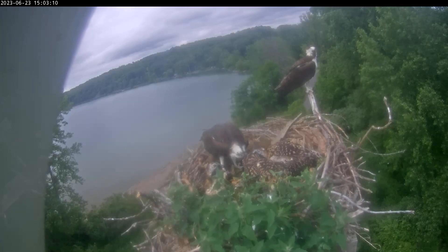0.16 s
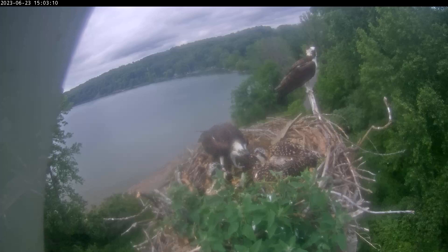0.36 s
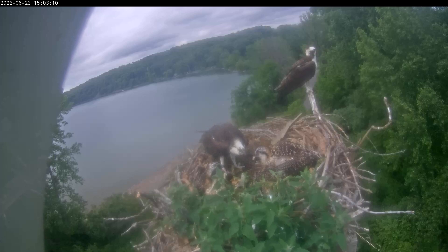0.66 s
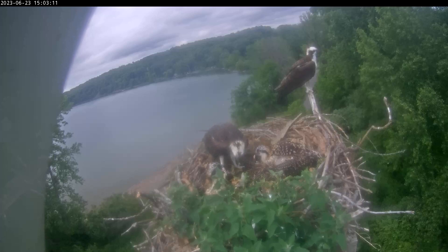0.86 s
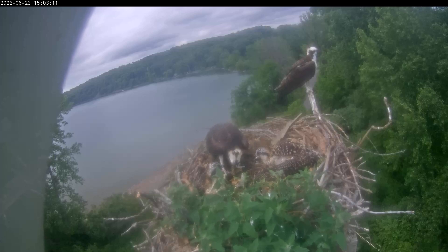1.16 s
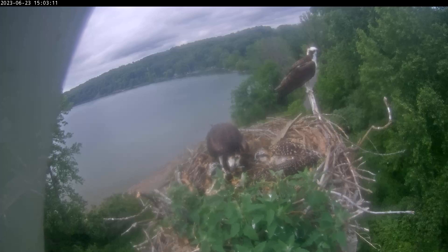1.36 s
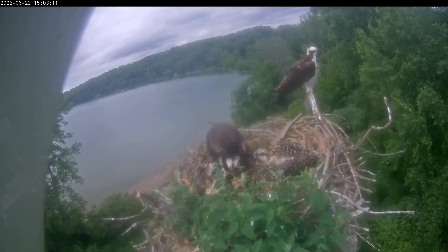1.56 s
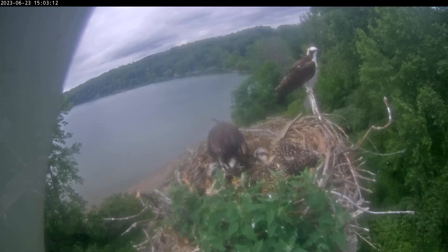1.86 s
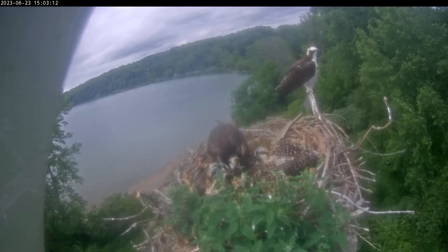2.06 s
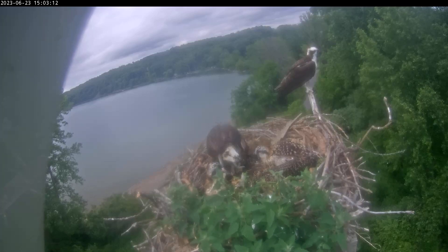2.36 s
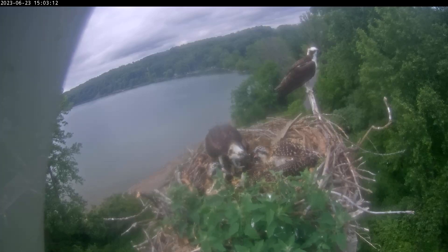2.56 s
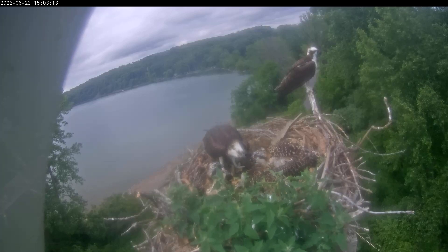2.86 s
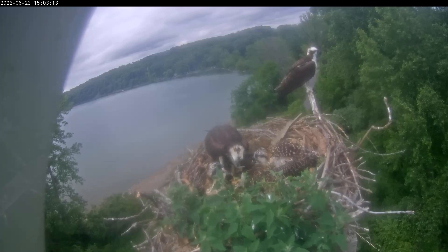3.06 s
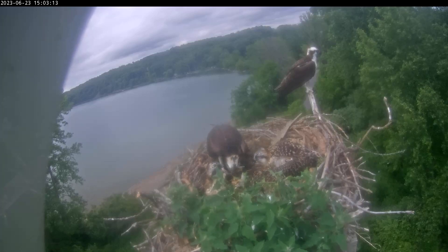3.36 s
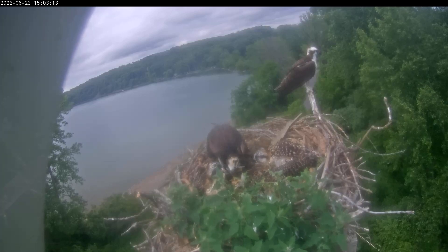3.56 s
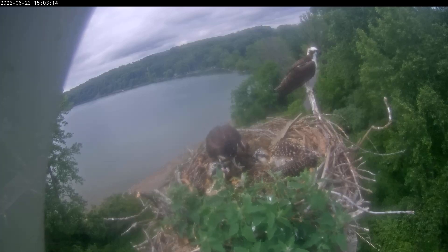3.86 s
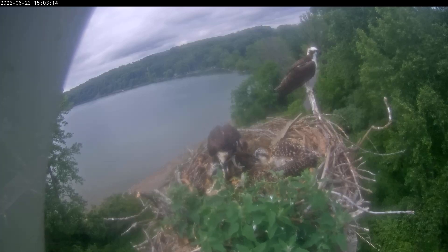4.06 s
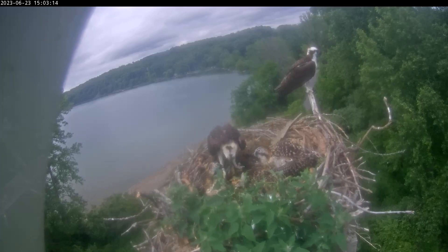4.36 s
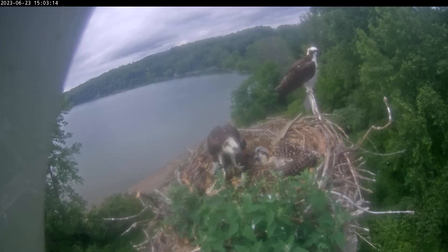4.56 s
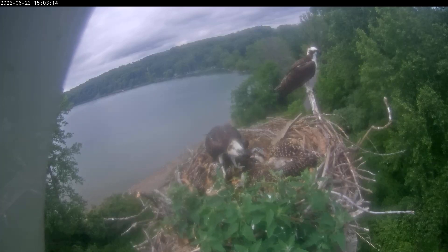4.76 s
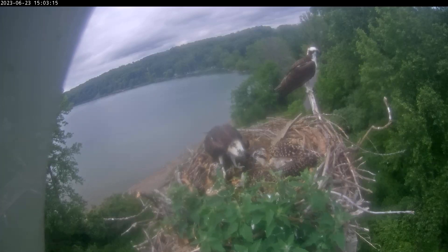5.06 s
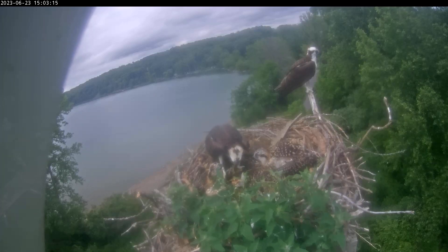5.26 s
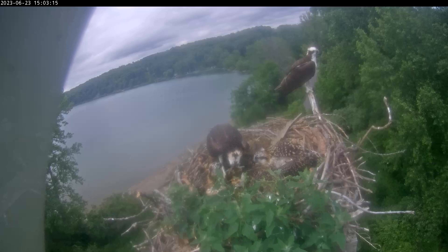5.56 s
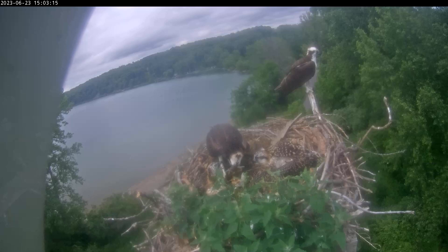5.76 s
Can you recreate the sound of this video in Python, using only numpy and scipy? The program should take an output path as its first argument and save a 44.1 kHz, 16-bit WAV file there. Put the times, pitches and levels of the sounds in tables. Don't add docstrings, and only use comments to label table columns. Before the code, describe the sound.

A chick squeak and a bright parent whistle open the scene, followed by twig rattle and thin distant piping. Sparse chirps, a wooden creak and small clicks follow; a rounder whistle stands out near the middle, then rapid squeaks and a harsh yelp cluster toward the end. Open lakeside woodland, little reverberation, dull small microphone with low wind buffeting and soft steady hiss.

```python
import sys
import numpy as np
from scipy import signal
from scipy.io import wavfile

SR = 44100
rng = np.random.default_rng(int(sys.argv[2]) if len(sys.argv) > 2 else 0)


def nominal_scale(level):
    x = np.asarray(level, float) / 20
    return 10 ** x


def pcm_store(signal):
    levels = np.round(np.clip(np.atleast_2d(signal), -1, 1) * 32767)
    wavfile.write(sys.argv[1], SR, levels.astype(np.int16).T)


N = 260190

# f/Hz, level per Hz/dB
AIR_COLOUR = [(93, -24.5), (135, -13), (290, -9.5), (328, -14), (484, -13), (2250, -23), (4330, -27),
              (8000, -34.5)]
AIR_DB = -62.5

# t/s, push level/dB
WIND_PUSH = [(0.0, -38), (0.3, -41), (1.0, -45), (1.07, -28.5), (1.2, -36.5), (1.44, -49.5), (1.6, -42),
             (1.9, -54), (1.97, -36), (2.07, -55), (3.1, -43.5), (3.27, -32.5), (3.35, -35.5), (3.5, -48.5),
             (4.6, -57), (4.81, -68), (4.9, -50.5), (5.9, -47)]
RUMBLE_DB, RUMBLE_FOLLOWS = -63, .22

# t/s, length/s, level/dB
FAR_PIPES = [(.175, 0.059, -58.5), (.485, 0.073, -57), (.695, .065, -59.5), (.84, 0.058, -56),
             (.99, 0.042, -55), (1.14, 0.046, -57), (1.245, .04, -69)]
PIPE_HZ = 4590
ANSWER_S, ANSWER_EVERY_S, ANSWER_LENGTH_S, ANSWER_HZ, ANSWER_DB = .645, .147, .029, 2505, -65
# t/s, length/s, start f/Hz, end f/Hz, level/dB
FAR_NOTES = [(.395, .015, 3100, 2600, -53), (.9, .07, 1580, 1560, -70.5), (1.235, .04, 3300, 3300, -65.5),
             (1.762, .032, 7050, 7100, -68), (2.815, .02, 2100, 2100, -65.5),
             (2.82, .022, 4150, 4400, -62.5), (3.015, .012, 2500, 2500, -64.5),
             (3.585, .015, 3000, 3000, -70), (3.905, .04, 8000, 8000, -65), (4.075, .03, 5300, 5300, -64.5),
             (4.5, .03, 5250, 5300, -61), (4.57, .015, 4450, 4550, -53), (4.843, .022, 3650, 3200, -57.5),
             (4.885, .04, 4600, 5400, -69), (5.04, .025, 6400, 5800, -61), (5.193, .027, 6300, 5700, -59.5),
             (5.505, .025, 6200, 5800, -66)]
# t/s, level/dB
CHORUS_LEVEL = [(0.0, -69.5), (0.35, -62.5), (0.8, -69.5), (2.48, -70), (2.97, -65.5), (3.57, -74),
                (3.93, -66), (4.76, -56.5), (5.21, -63), (5.9, -74)]
# f/Hz, width/Hz, level/dB
FAR_VOICES = [
    (4350, 760, -2),
    (4820, 130, -7),
    (5310, 330, -6),
]
# t/s, half length/s, level/dB
HIGH_SWELLS = [(0.475, 0.16, -71.5), (2.972, 0.28, -66.5), (4.417, 0.24, -66), (5.1, .1, -62),
               (5.33, .13, -61), (5.55, .1, -67)]
HIGH_REST_DB = -78.5

# t/s, level/dB
THUDS = [(.43, -55), (.54, -53), (.66, -55), (.76, -55), (1.74, -55), (2.3, -57), (3.86, -55), (4.3, -57)]
THUD_HZ, THUD_S = 150, .035

# t/s, peak level/dB, brightness/dB, rattle length/s
TICKS = [(0.387, -37.5, -1.5, 0.0073), (0.438, -44, -9, 0.016), (0.641, -43.5, -33, 0.014),
         (0.716, -41.5, -24, 0.0061), (0.743, -50.5, -13, 0.026), (0.765, -42, -25, 0.0066),
         (1.292, -42, -33, 0.017), (1.303, -39.5, -38, 0.0065), (1.623, -44.5, -39, 0.0058),
         (1.632, -43.5, -32, 0.021), (1.942, -39.5, -39, 0.02), (1.955, -37.5, -39, 0.014),
         (2.239, -40, -50, 0.012), (2.244, -52, -22, 0.0055), (2.321, -42, 10, 0.012),
         (2.85, -51.5, -2, 0.0096), (3.843, -50, -28, 0.015), (3.855, -43, -25, 0.0091),
         (4.283, -43, -7, 0.005), (4.312, -50.5, 8, 0.021), (4.722, -42.5, -29, 0.03),
         (4.964, -42.5, -29, 0.024), (5.328, -43.5, 1, 0.0059), (5.566, -43.5, -32, 0.0088)]
# t/s, peak level/dB
CREAK_SLIPS = [(1.696, -44), (1.7096, -46), (1.721, -41), (1.731, -41.5), (1.7438, -46.5), (1.7552, -42)]
# t/s, peak level/dB
SNAPS = [(0.6234, -53), (1.9577, -58), (4.085, -60), (4.1044, -58), (4.131, -51)]
# f/Hz, width/Hz, level/dB
TWIG_RESONANCES = [
    (537, 810, 3.5),
    (1556, 310, 5),
    (2360, 180, 0.5),
]

# t/s, length/s, first f/Hz, last f/Hz, level/dB
HOOKS = [(.3, .064, 2240, 2230, -40.5), (4.807, .061, 2330, 2480, -47.5), (1.98, 0.03, 2650, 2700, -59)]
PEEPS = [(1.326, .025, 2480, 2800, -57), (1.347, .021, 2800, 3030, -51), (1.364, 0.033, 3110, 3120, -43.5),
         (1.685, 0.033, 2710, 2986, -43.5), (3.945, 0.025, 2730, 2960, -53), (4.787, .02, 2500, 2290, -57),
         (5.0, 0.025, 2160, 2310, -58.5)]
EARLY_FLICK = [(.693, .025, 3500, 3550, -45.5)]
FLICKS = [(2.284, .018, 4350, 5800, -46), (5.287, .028, 3150, 4420, -45)]
CHATTER = [(.721, .011, 3050, 2930, -47), (.729, .009, 3250, 3750, -48), (2.019, .036, 2894, 3150, -45.5)]
RASPS = [(2.314, 0.02, 3800, 3380, -50), (2.33, 0.039, 3002, 3035, -45), (2.368, 0.018, 2990, 2860, -57.5),
         (3.905, 0.039, 2600, 2840, -57), (4.285, .022, 2815, 3250, -51.5), (5.333, .014, 2820, 2880, -50),
         (5.349, .02, 2930, 2870, -54), (5.632, .029, 2653, 2813, -49)]
YIP = [(4.237, .036, 2850, 3650, -54)]
TAILS = [(2.053, .021, 3200, 2100, -55), (4.269, .014, 3700, 2900, -48), (5.315, .014, 4300, 3300, -43),
         (2.331, .012, 2450, 2350, -50), (2.346, .012, 2250, 2150, -53)]
BENDS = [(5.654, .035, 2790, 2480, -47)]
HOARSE = [(1.67, 0.018, 2430, 2350, -53), (1.981, .022, 2380, 2450, -52.5), (4.522, .066, 2400, 2534, -58),
          (5.066, 0.026, 2300, 2820, -56), (5.086, .03, 2810, 2220, -56)]
ARCHES = [(.431, 0.083, 1725, 1744, -36)]
ROUND = [(2.903, 0.087, 1749, 1761, -34)]
SLURS = [(4.739, .048, 1537, 1830, -47.5), (4.975, 0.027, 1422, 1660, -52)]
YELP = [(4.576, .036, 1900, 1590, -41.5)]

HOOK = dict(arch=.125, top=.66, warble=0, swell_db=4, lean_db=2.5, edge_s=.008,
            rough=(.04, .05), partials_db=(-18,))
PEEP = dict(arch=.025, top=.55, warble=0, swell_db=2, lean_db=.5, edge_s=.0052,
            rough=(.05, .071), partials_db=(-20,))
EARLY = dict(arch=.21, top=.45, warble=0, swell_db=.5, lean_db=-12, edge_s=.004,
             rough=(.01, .22), partials_db=(-32,))
FLICK = dict(arch=.035, top=.5, warble=0, swell_db=3, lean_db=-3, edge_s=.005,
             rough=(.0086, .08), partials_db=(-19,))
CHAT = dict(arch=.014, top=.62, warble=.015, swell_db=1, lean_db=-3.5, edge_s=.005,
            rough=(.15, .32), partials_db=(-26,))
RASP = dict(arch=.013, top=.55, warble=.032, swell_db=1, lean_db=-3, edge_s=.0056,
            rough=(.25, .2), partials_db=(-7,))
YIPPED = dict(arch=.06, top=.75, warble=0, swell_db=3, lean_db=6, edge_s=.005,
              rough=(.03, .08), partials_db=(-5.5,))
TAIL = dict(arch=.03, top=.45, warble=0, swell_db=3, lean_db=-7, edge_s=.004,
            rough=(.15, .4), partials_db=(-25,))
BEND = dict(arch=.14, top=.76, warble=.015, swell_db=3, lean_db=-1.5, edge_s=.006,
            rough=(.1, .08), partials_db=(-8,))
FLUTTERED = dict(arch=.024, top=.6, warble=.005, swell_db=0, lean_db=5, edge_s=.0064,
                 rough=(.15, .2), partials_db=(-14.5,))
ARCH = dict(arch=.091, top=.52, warble=0, swell_db=7, lean_db=-1, edge_s=.01,
            rough=(.013, .015), partials_db=(-8.5, -9.5, -31))
ROUNDED = dict(arch=.083, top=.52, warble=0, swell_db=8, lean_db=-4.5, edge_s=.0068,
               rough=(.01, .016), partials_db=(-8.5, -16, -20))
SLUR = dict(arch=-.04, top=.65, warble=0, swell_db=.5, lean_db=3, edge_s=.007,
            rough=(.04, .05), partials_db=(-5.3, -9.5, -19))
YELPED = dict(arch=.07, top=.62, warble=-.012, swell_db=1.5, lean_db=4, edge_s=.009,
              rough=(.11, .11), partials_db=(-5, -8, -26))
WARBLE_HZ, WARBLE_DIP_DB = 52.7, 119
FLUTTER_HZ = 460

IMAGE_HZ = 16000
OFFSET = .0131


def rms_one(x):
    return x / np.sqrt(np.mean(x ** 2) + 1e-20)


def in_time(rows):
    s, *columns = np.transpose(rows)
    start, end = round(s[0] * SR), min(N, round(s[-1] * SR))
    t = np.arange(start, end) / SR
    return start, [np.interp(t, s, column) for column in columns]


def add(out, at, x):
    out[at:at + len(x)] += x[:N - at]


def band(x, lo_hz, hi_hz, order=2):
    return signal.sosfilt(signal.butter(order, [lo_hz, hi_hz], "band", fs=SR, output="sos"), x)


def lowpass(x, hz):
    return signal.sosfilt(signal.butter(2, hz, fs=SR, output="sos"), x)


def drift(rate_hz):
    r = np.exp(-2 * np.pi * rate_hz / SR)
    slow = signal.lfilter([1], [1, -2 * r, r * r], rng.standard_normal(N + SR))
    return rms_one(slow[SR:])


def resonance(x, hz, width_hz):
    r = np.exp(-np.pi * width_hz / SR)
    feedback = [1, -2 * r * np.cos(2 * np.pi * hz / SR), r * r]
    return signal.lfilter([(1 - r * r) / 2, 0, (r * r - 1) / 2], feedback, x)


def air():
    out, white, together = 0, rng.standard_normal((2, N)), drift(1.6)
    edges = 93 * 2 ** np.arange(0, 6.4, 1 / 3)
    hz, db = np.transpose(AIR_COLOUR)
    for k, (low, high) in enumerate(zip(edges, edges[1:])):
        colour_db = np.interp(np.log(low * high) / 2, np.log(hz), db)
        flicker_db = .5 * together + .88 * drift(8.1)
        out = out + nominal_scale(colour_db + flicker_db) * band(white[k % 2], low, high)
    return nominal_scale(AIR_DB) * rms_one(out)


def wind():
    at, (push_db,) = in_time(WIND_PUSH)
    rumble_db = RUMBLE_DB + RUMBLE_FOLLOWS * (push_db + 45)
    push = rms_one(band(rng.standard_normal(N + SR), 8, 48, order=1)[SR:])
    push = lowpass(push * nominal_scale(1.2 * drift(4.8)), 48)
    rumble = band(rng.standard_normal(N + SR), 45, 125)[SR:]
    rumble = rms_one(rumble * nominal_scale(2.5 * drift(9)))
    out = np.zeros(N)
    add(out, at, nominal_scale(push_db - 4) * push[:len(push_db)] + nominal_scale(rumble_db) * rumble[:len(push_db)])
    return out


def far_voice(hz, width_hz):
    blur = lowpass(rng.standard_normal((2, N)), width_hz / 2)
    turn = 2 * np.pi * np.cumsum(hz * (1 + .035 * drift(4))) / SR
    return rms_one(blur[0] * np.sin(turn) + blur[1] * np.cos(turn))


def far_chorus():
    chorus = sum(nominal_scale(db + 1.6 * drift(9)) * far_voice(hz, width) for hz, width, db in FAR_VOICES)
    at, (lower_db,) = in_time(CHORUS_LEVEL)
    out, t = np.zeros(N), np.arange(N) / SR
    add(out, at, nominal_scale(lower_db - 3.5) * rms_one(band(chorus, 2200, 7300))[:len(lower_db)])
    swells = sum(nominal_scale(db) * np.exp(-((t - s) / half) ** 2) for s, half, db in HIGH_SWELLS)
    upper = band(rng.standard_normal(N), 5100, 7100, order=3) * nominal_scale(3.2 * drift(14))
    return out + (nominal_scale(HIGH_REST_DB) + swells) * nominal_scale(-5) * rms_one(upper)


def far_birds():
    out = np.zeros(N)
    pipes = [(s, length, PIPE_HZ, PIPE_HZ, db) for s, length, db in FAR_PIPES]
    answers = [(ANSWER_S + k * ANSWER_EVERY_S, ANSWER_LENGTH_S, ANSWER_HZ, ANSWER_HZ, ANSWER_DB)
               for k in range(4)]
    for s, length, start_hz, end_hz, db in pipes + answers + FAR_NOTES:
        n = round(length * SR)
        glide = np.sin(2 * np.pi * np.cumsum(np.linspace(start_hz, end_hz, n)) / SR)
        add(out, round(s * SR), np.sqrt(2) * nominal_scale(db) * glide * np.hanning(n) ** .41)
    for lag, db in [(.031, -17), (.068, -18)]:
        add(out, round(lag * SR), nominal_scale(db) * out.copy())
    return out + far_chorus()


def sway():
    t = np.arange(N) / SR
    shape = sum(nominal_scale(db) * np.exp(-((t - s) / THUD_S) ** 2) for s, db in THUDS)
    return shape * nominal_scale(-6) * rms_one(band(rng.standard_normal(N), THUD_HZ / 1.3, THUD_HZ * 1.6))


def twig_ticks():
    low, high = np.full(N, 1e-18), np.full(N, 1e-18)
    draws = rng.random((len(TICKS), 2, 900))
    for (s, db, bright_db, length), (when, size) in zip(TICKS, draws):
        fade = np.exp(-(np.arange(900) / (length * SR + 1)) ** 2)
        rattle = (when < .035) * (2 * size - 1) * fade
        rattle[0] = 1.8
        add(low, round(s * SR), nominal_scale(db) * rattle)
        add(high, round(s * SR), nominal_scale(db + min(bright_db, -14)) * rattle)
    body = nominal_scale(16) * sum(nominal_scale(db) * resonance(low, hz, width) for hz, width, db in TWIG_RESONANCES)
    body = band(body, 83, 2600, order=4)
    bright = band(high, 4500, 6600) + nominal_scale(2.5) * resonance(high, 3600, 500)
    return body + nominal_scale(21.5) * bright


def clicks(table):
    train = np.full(N, 1e-18)
    train[[round(s * SR) for s, db in table]] = nominal_scale(np.array(table)[:, 1])
    return train


def creak():
    slips = clicks(CREAK_SLIPS)
    ringing = nominal_scale(32.5) * resonance(slips, 1740, 190) + nominal_scale(29.5) * resonance(slips, 400, 330)
    return band(ringing, 150, 2260, order=3)


def grunt():
    s, length, hz, db = .603, .026, 410, -54
    n, out = round(length * SR), np.zeros(N)
    turn = 2 * np.pi * hz * np.arange(n) / SR
    buzz = np.sin(turn) + .4 * np.sin(2 * turn) + 1.2 * np.sin(3 * turn) + .3 * np.sin(4 * turn)
    add(out, round(s * SR), nominal_scale(db) * np.sqrt(np.hanning(n)) * buzz)
    return out


def nest():
    return twig_ticks() + creak() + nominal_scale(23) * band(clicks(SNAPS), 4000, 12000) + grunt()


def sung(call, arch, top, warble, swell_db, lean_db, edge_s, rough, partials_db):
    s, length, first_hz, last_hz, db = call
    along = np.linspace(0, 1, round(length * SR))
    bow = np.sin(np.pi * along ** (np.log(.5) / np.log(top)))
    waver = warble * np.cos(2 * np.pi * WARBLE_HZ * length * along)
    hz = (first_hz + (last_hz - first_hz) * along) * (1 + arch * bow - waver)
    edges = np.clip(np.minimum(along, 1 - along) * length / edge_s, 0, 1) ** .96
    level_db = db - swell_db * (1 - bow) + lean_db * (along - .5) + WARBLE_DIP_DB * waver
    height = np.sqrt(2) * edges * nominal_scale(level_db)
    effort = height / height.max()
    heights = [height]
    for k, partial_db in enumerate(partials_db):
        heights.append(nominal_scale(partial_db) * height * effort ** (.29 * k + .53))
    return round(s * SR), hz, heights, np.clip(rough[0] + (rough[1] - rough[0]) * along, 0, 1)


def voice(kinds, flutter_lines):
    out = np.zeros(N)
    gaps = np.tanh(18 * resonance(rng.standard_normal(N), 130, 120))
    shake = rms_one(resonance(rng.standard_normal(N), 580, 300))
    breath = band(rng.standard_normal(N), 2000, 3000) + nominal_scale(.5) * band(rng.standard_normal(N), 3100, 12000)
    breath = rms_one(band(breath, 1800, 7900, order=3) * nominal_scale(4 * drift(150)))
    flutter = 2 * np.pi * np.cumsum(FLUTTER_HZ * (1 + .034 * drift(40))) / SR
    for call, manner in [(call, manner) for calls, manner in kinds for call in calls]:
        at, hz, heights, rough = sung(call, **manner)
        here = slice(at, at + len(hz))
        turn = 2 * np.pi * np.cumsum(hz * (1 + .1 * rough * gaps[here])) / SR
        turn = turn + 1.5 * rough * shake[here]
        note = sum(height * np.sin((k + 1) * turn + k) for k, height in enumerate(heights))
        note += .16 * heights[1] * np.sin(3 * turn)
        note += heights[0] * sum(share * np.sin(turn + step * flutter[here]) for step, share in flutter_lines)
        note *= 1 + np.minimum(1.5 * rough, .9) * gaps[here]
        add(out, at, note + nominal_scale(-13) * heights[0] * rough * breath[here])
    return out


def chicks():
    plain = [(HOOKS, HOOK), (PEEPS, PEEP), (EARLY_FLICK, EARLY), (FLICKS, FLICK), (CHATTER, CHAT),
             (RASPS, RASP), (YIP, YIPPED), (TAILS, TAIL), (BENDS, BEND)]
    return voice(plain, []) + voice([(HOARSE, FLUTTERED)], [(1, .58), (2, .3)])


def parent():
    return voice([(ARCHES, ARCH), (ROUND, ROUNDED), (SLURS, SLUR), (YELP, YELPED)], [])


def scene():
    out = air() + wind() + far_birds() + sway() + nest() + chicks() + parent()
    return out[None]


def top_cut(x):
    return signal.sosfilt(signal.butter(12, 8760, fs=SR, output="sos"), x)


def record(dry):
    dull = signal.sosfilt(signal.cheby2(10, 40, 8300, fs=SR, output="sos"), dry)
    mirror = nominal_scale(-8) * dull * np.cos(2 * np.pi * IMAGE_HZ * np.arange(N) / SR)
    mirror = signal.sosfilt(signal.ellip(7, .5, 70, 8550, fs=SR, output="sos"), mirror)
    return top_cut(dull + mirror + OFFSET)


dry = scene()
out = record(dry)
pcm_store(out)
```